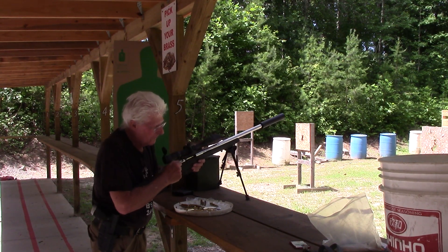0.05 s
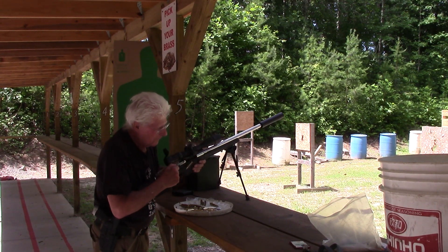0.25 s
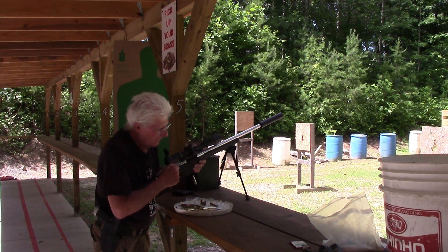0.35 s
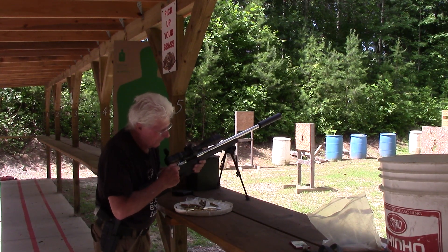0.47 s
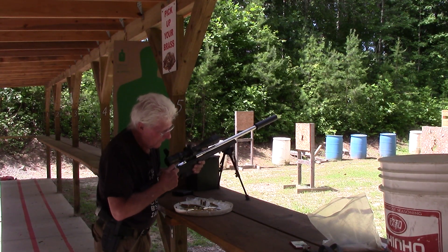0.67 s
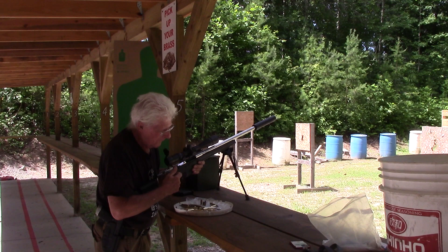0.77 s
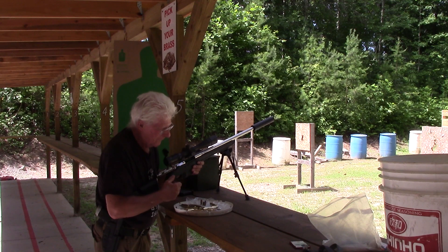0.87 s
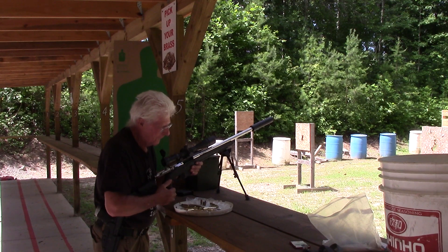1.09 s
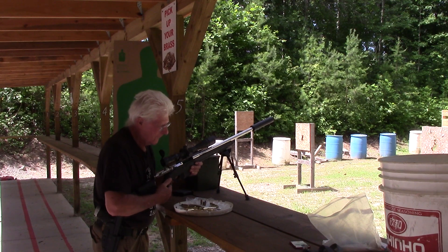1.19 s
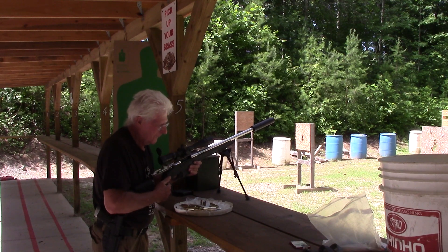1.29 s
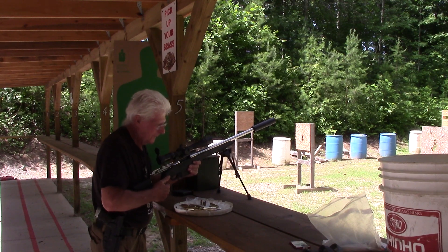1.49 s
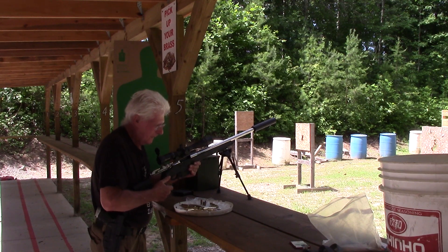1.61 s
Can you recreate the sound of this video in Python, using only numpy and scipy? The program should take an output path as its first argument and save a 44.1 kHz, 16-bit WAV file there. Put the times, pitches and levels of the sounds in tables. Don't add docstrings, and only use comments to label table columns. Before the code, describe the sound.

A rifle bolt is drawn back, hitting its stop with a bright metallic clack; the ejected brass case rings, knocks on a wooden bench, bounces and rolls, then faint handling clicks under an open shelter.

```python
import sys
import numpy as np
from scipy import signal
from scipy.fft import rfft, irfft
from scipy.io import wavfile
from scipy.ndimage import uniform_filter1d

SR = 44100
rng = np.random.default_rng(int(sys.argv[2]) if len(sys.argv) > 2 else 0)


def store_wav(level_fs):
    pcm = np.round(np.clip(np.atleast_2d(level_fs), -1, 1) * 32767)
    wavfile.write(sys.argv[1], SR, pcm.T.astype(np.int16))


def gain_from_decibels(decibels):
    exponent = np.asarray(decibels, float) / 20
    return 10 ** exponent


N = 72765

# (frequency [Hz], level [dB per Hz])
AIR = [(15, -45), (25, -24), (116, -6.5), (178, -15.5), (1170, -24.5), (1270, -22), (15500, -40)]
# (time [s], level [dB])
ENGINE_LEVEL = [(0, -43.5), (.12, -42), (.22, -44.5), (.35, -40.5), (.5, -41), (.6, -97), (.74, -81),
                (.85, -72), (1.1, -59), (1.65, -45)]
# (frequency [Hz], width [Hz], level [dB])
ENGINE_BANDS = [(77, 8.9, 8), (128, 30, 8.5), (156.6, 4.7, -5)]

# (time [s], crack [dB], receiver [dB], stock [dB], 60 dB fade [s])
BOLT_BLOWS = [
    (0.0024, -46, -48.5, -64.5, 0.11),
    (0.0548, -32, -33, -49.5, 0.16),
    (0.0835, -37, -55, -49.5, 0.064),
    (0.2143, -11.5, -38, -59, 0.051),
    (0.2574, -16.5, -38, -63, 0.1),
    (0.2768, -20.5, -22.5, -34, 0.074),
    (0.2879, -13, -51, -31, 0.024),
    (0.2945, -15, -44, -55, 0.09),
]
# (time [s], crack [dB], receiver [dB], stock [dB], 60 dB fade [s])
SLIDES = [
    (0.056, -54, -43, -64.5, 0.061),
    (0.2084, -4.5, -35.5, -54.5, 0.024),
    (0.2101, -21.5, -28.5, -37.5, 0.033),
    (0.2165, -6, -27, -62, 0.15),
    (0.2255, -11, -29.5, -66, 0.089),
    (0.309, -41.5, -26, -77, 0.041),
    (0.334, -31, -49, -63, 0.032),
]
# (frequency [Hz], level [dB])
STEEL_CRACK = [(2500, 3), (5000, 8.5), (9000, 6), (12500, 0.5), (15500, -17)]
# (frequency [Hz], width [Hz], level [dB])
RECEIVER = [(1398, 47, -0.5), (1686, 250, 1), (2020, 420, 7.5), (2246, 140, -9), (2790, 330, -2.5)]
# (frequency [Hz], width [Hz], level [dB])
STOCK = [(272, 54, 5), (533.6, 30, 18.5), (745, 39, -24.5)]
TICK_DBS = (16, 17.5, 22)
FADE_FACTORS = (0.65, 0.97, 1.16)

# (frequency [Hz], 60 dB fade [s])
SHELTER_FADE = [(300, 0.21), (1000, 0.26), (3000, 0.35), (8000, 0.24), (15000, 0.12)]
# (time [s], frequency [Hz], level [dB], 60 dB fade [s])
STRUCK_TONES = [(.0548, 4950, -44, .035), (.0548, 1500, -38, .05), (.2143, 13480, -14, .018),
                (.2143, 13720, -18, .02), (.2143, 6300, -15, .014), (.2143, 9000, -15, .01),
                (.2143, 2150, -27, .07), (.2768, 540, -32, .05), (.2879, 540, -34, .06),
                (.5234, 112, -27, .085), (.5234, 468, -15, .1), (.5234, 515, -17, .1),
                (.5234, 592, -11, .12), (.5262, 870, -18, .07), (.5262, 912, -18, .09),
                (.5234, 316, -22, .08), (.5687, 1625, -25, .06), (.6085, 885, -23, .05),
                (.6085, 965, -22, .05), (.984, 6600, -54, .04), (.996, 4700, -58, .09),
                (1.2739, 1350, -43, .03), (1.2739, 4150, -49, .022), (1.3491, 1000, -37, .045),
                (1.3491, 1320, -37, .04), (1.3981, 970, -42, .035), (1.3981, 1330, -41, .035),
                (1.537, 1900, -55, .08), (1.567, 430, -50, .05)]
# (time [s], level [dB])
RUSTLE = [(.14, -69.5), (.2, -58), (.21, -70.5), (.4, -76), (.51, -58.5), (.53, -82), (1.04, -69),
          (1.055, -53.5), (1.1, -60.5), (1.14, -77.5), (1.3, -80), (1.32, -49.5), (1.38, -68), (1.42, -59),
          (1.47, -65), (1.57, -67.5), (1.65, -69)]
# (frequency [Hz], level [dB])
FINE_CRACK = [(2500, -11), (5000, -6.5), (8500, -2), (15500, -14.5)]

# (time [s], four tone levels [dB, dB, dB, dB])
RINGS = [(.2143, -42, -40, -60, -36), (.2302, -44, -40, -22, -34), (.245, -42, -43, -26, -36),
         (.2574, -41, -40, -30, -33), (.272, -46, -43, -26, -33), (.306, -38, -38, -40, -38),
         (.352, -56, -58, -42, -54), (.395, -64, -57, -56, -56), (.5229, -85, -75, -70, -75),
         (.5686, -75, -52, -42, -40), (.6085, -75, -52, -44, -52), (.64, -80, -70, -66, -68),
         (.7168, -80, -62, -53, -74), (.748, -80, -57, -56, -74), (.805, -80, -59, -60, -86),
         (.86, -82, -64, -63, -65), (.94, -85, -84, -80, -73), (.985, -51, -74, -72, -77),
         (1.0, -55, -58, -66, -75), (1.0525, -95, -95, -95, -95)]
CASE_HZ = (6471, 9436, 13104, 14525)
# (60 dB fade [s], tumble rate [Hz], tumble depth [0-1])
CASE_SWING = [(.2, 13, .4), (.33, 19, .55), (.2, 27, .5), (.22, 31, .6)]
CASE_GAIN_DBS = (2, 4, 3, 4.5)
# (frequency [Hz], RINGS column followed [-], level [dB], 60 dB fade [s])
SIDE_TONES = [(10950, 3, -2, .07), (4680, 2, 0, .2)]
# (time [s], left level [dB], right level [dB])
RIM = [
    (.2141, -40, -40),
    (.2145, -5, -10),
    (.218, -3, -6),
    (.2245, -4, -9),
    (.2265, -13, -10),
    (.228, -34, -14),
    (.232, -60, -40),
]

# (time [s], crack [dB], knock [dB], plank [dB], 60 dB fade [s])
BOUNCES = [(0.5234, 0, -4, -14, 0.063), (0.5262, -47, -15, -21, 0.073), (0.5333, -7.5, -16, -6, 0.05),
           (0.55, -14.5, -27.5, -19.5, 0.2), (0.5687, -14.5, -18, -16.5, 0.13),
           (0.6085, -16, -22, -21, 0.15), (0.614, -33, -40, -15, 0.05), (0.6785, -36, -46, -25, 0.06),
           (0.7169, -17.5, -23, -20.5, 0.085), (0.805, -44, -53, -52, 0.057), (0.86, -62, -56, -54, 0.082),
           (0.9824, -44.5, -49, -42.5, 0.22), (1.0511, -42.5, -59, -60, 0.1), (1.079, -47, -59, -44, 0.077),
           (1.1194, -40, -50, -78, 0.03)]
# (frequency [Hz], level [dB])
WOOD_CRACK = [(1470, -21), (2500, -2), (4470, -7.5), (4860, -4.5), (11000, -18), (15500, -30)]
# (frequency [Hz], width [Hz], level [dB])
KNOCK = [(1332, 150, 6), (1442, 150, -2), (1600, 210, 8), (1880, 41, -0.5), (2043, 20, -15), (2230, 25, -7),
         (2400, 70, -4.5), (2800, 61, -23)]
# (frequency [Hz], width [Hz], level [dB])
PLANK = [(316, 40, -8), (468, 34, 0), (515, 37, -2), (592, 30, 4), (745, 40, -9), (868, 45, -3),
         (912, 40, -2), (985, 80, -3), (1080, 60, -9)]
WOOD_TICK_DBS = (14, 18, 20)
# (time [s], level [dB])
ROLL = [
    (.73, -44),
    (.8, -49),
    (.86, -48),
    (.91, -51),
    (.96, -50.5),
    (1.02, -49),
    (1.07, -55.5),
    (1.15, -79),
]

# (time [s], crack [dB], held bolt [dB], plank [dB], 60 dB fade [s])
HANDLING = [
    (1.2739, -63.5, -41, -82, 0.031),
    (1.317, -41, -51, -63, 0.25),
    (1.3491, -57, -35, -51, 0.095),
    (1.3981, -51, -37, -76, 0.054),
    (1.4107, -37.5, -60, -49, 0.11),
    (1.536, -47, -57, -55, 0.1),
    (1.5693, -39, -63.5, -51, 0.054),
    (1.6, -83.5, -80, -51, 0.041),
]
# (frequency [Hz], width [Hz], level [dB])
HELD_BOLT = [(1000, 220, 2), (1360, 260, 5), (1980, 300, -12), (2850, 500, -5), (4150, 500, 0)]
# (frequency [Hz], likeness [0-1])
LIKENESS = [(60, 0.8), (500, 1), (2000, 1), (5000, 0.49), (15000, 0.45)]


def evened(x):
    return x / np.sqrt(np.mean(x ** 2) + 1e-20)


def read(points, hz):
    f, value = np.transpose(points)
    return np.interp(np.log(hz + 1), np.log(f + 1), value)


def level(points):
    s, db = np.transpose(points)
    return gain_from_decibels(np.interp(np.arange(N) / SR, s, db, left=-140, right=-140))


def highpass(x, order, hz):
    return signal.sosfilt(signal.butter(order, hz, 'high', fs=SR, output='sos'), x)


def colour(x, points):
    return irfft(rfft(x) * gain_from_decibels(read(points, np.fft.rfftfreq(N, 1 / SR))), N)


def body(x, peaks):
    t = np.arange(4096) / SR
    ring = np.zeros(4096)
    for hz, width, db in peaks:
        fade = np.exp(-np.pi * width * t)
        ring += gain_from_decibels(db) * np.sqrt(width) * fade * np.sin(2 * np.pi * hz * t)
    return signal.oaconvolve(x, ring[None] / np.linalg.norm(ring), axes=1)[:, :N]


def crack(x, points):
    hz = np.linspace(0, SR / 2, 257)
    gain = gain_from_decibels(2 * read([(900, -21.0)] + list(points), hz)) * (hz < SR / 2)
    taps = signal.minimum_phase(signal.firwin2(255, hz, gain, fs=SR))
    return signal.oaconvolve(x, taps[None] / np.linalg.norm(taps), axes=1)[:, :N]


def hits(rows, top, middle, low, tick_dbs=TICK_DBS):
    rise_s = 0.00043
    t = np.arange(N) / SR
    noise = rng.standard_normal((3, 2, N))
    power, ticks = np.zeros((3, 1, N)), np.zeros((3, 1, N))
    for s, *dbs, t60 in rows:
        u = np.maximum(t - s, 0)
        gains = gain_from_decibels(np.array(dbs) + [-6, 1.5, 1.5])
        fade = np.array([gain_from_decibels(-60 * u / (t60 * k)) for k in FADE_FACTORS])
        shape = fade * (1 - np.exp(-u / rise_s))
        power += ((shape * gains[:, None]) ** 2)[:, None]
        ticks[:, 0, round(s * SR)] -= gains * gain_from_decibels(np.array(tick_dbs))
    drive = np.sqrt(power) * noise + ticks
    return crack(drive[0], top) + body(drive[1], middle) + body(drive[2], low)


def woods():
    air = gain_from_decibels(-52.5) * evened(colour(rng.standard_normal((2, N)), AIR))
    engine = body(rng.standard_normal((2, N)), ENGINE_BANDS)
    return air + 0.64 * level(ENGINE_LEVEL) * highpass(engine, 3, 58)


def bolt():
    blows = hits(BOLT_BLOWS, STEEL_CRACK, RECEIVER, STOCK)
    scrapes = hits(SLIDES, STEEL_CRACK, RECEIVER, STOCK, (-60, -60, -60))
    return blows + scrapes


def shelter(x):
    taps = np.zeros((2, SR // 2))
    at = np.arange(200, SR // 2 - 20, 20)
    at = at + rng.integers(0, 20, (2, len(at)))
    np.put_along_axis(taps, at, rng.choice([-1., 1.], at.shape), 1)
    hz, t, z = signal.stft(taps, SR, nperseg=256)
    fade = gain_from_decibels(-60 * t / read(SHELTER_FADE, hz)[:, None])
    tail = signal.istft(z * fade, SR, nperseg=256)[1]
    return signal.fftconvolve(x, tail / np.linalg.norm(tail[0]), axes=1)[:, :N]


def struck():
    out = np.zeros(N)
    for s, hz, db, t60 in STRUCK_TONES:
        u = np.maximum(np.arange(N) / SR - s, 0)
        rise = 1 - np.exp(-2 * hz * u)
        out += rise * gain_from_decibels(db - 60 * u / t60) * np.sin(2 * np.pi * hz * u)
    return out


def rustle():
    swell = evened(uniform_filter1d(rng.standard_normal(N), size=90))
    grains = rng.standard_normal((2, N)) * gain_from_decibels(3.6 * swell)
    return 2 * crack(evened(grains) * level(RUSTLE), FINE_CRACK)


def case():
    flutter_db, flutter_s = 3, 0.008
    rim_hz, rim_db = 13155, 1
    t, rows = np.arange(N) / SR, np.array(RINGS)
    k = np.maximum(np.searchsorted(rows[:, 0], t) - 1, 0)
    u = t - rows[k, 0]
    out = np.zeros((2, N))
    for m, (hz, (t60, tumble_hz, depth)) in enumerate(zip(CASE_HZ, CASE_SWING)):
        fade = (u >= 0) * gain_from_decibels(rows[k, 1 + m] + CASE_GAIN_DBS[m] - 60 * abs(u) / t60)
        fade = uniform_filter1d(fade, size=40)
        for ch, lag in enumerate((.02, .3)):
            swing = 1 + depth * np.cos(2 * np.pi * (tumble_hz * u + lag * m))
            flutter = rng.standard_normal(N)
            for _ in range(2):
                flutter = uniform_filter1d(flutter, round(flutter_s * SR))
            flutter = evened(flutter)
            tone = np.sin(2 * np.pi * hz * t + 1.2 * ch * flutter)
            out[ch] += fade * swing * gain_from_decibels(flutter_db * flutter) * tone
    for hz, follows, db, t60 in SIDE_TONES:
        fade = gain_from_decibels(rows[k, follows] + db - 60 * abs(u) / t60)
        out += fade * (t > BOUNCES[8][0]) * np.sin(2 * np.pi * hz * t)
    s, *sides = np.transpose(RIM)
    facing = np.array([level(np.transpose([s, db + rim_db])) for db in sides])
    return 2 * out + facing * np.sin(2 * np.pi * rim_hz * t)


def bounces():
    return hits(BOUNCES, WOOD_CRACK, KNOCK, PLANK, WOOD_TICK_DBS)


def roll():
    taps_per_s, spread_db, knock_db, crack_db = 320, 6, -10, -43
    chosen = rng.random(N) < taps_per_s / SR
    strength = gain_from_decibels(spread_db * np.minimum(rng.exponential(1, N), 2.5))
    taps = rng.standard_normal((2, N)) * (0.33 + chosen * strength)
    taps = 2 * evened(taps) * level(ROLL)
    knock = gain_from_decibels(knock_db) * body(taps, KNOCK)
    return body(taps, PLANK) + knock + gain_from_decibels(crack_db) * crack(taps, WOOD_CRACK)


def handling():
    return hits(HANDLING, FINE_CRACK, HELD_BOLT, PLANK)


def scene():
    shelter_db, right_db = -10.5, -20.5
    near = bolt() + rustle() + bounces() + roll() + handling()
    near = highpass(near, 2, 260)
    near = near + struck()
    brass = case()
    left, other = near + gain_from_decibels(shelter_db) * shelter(near + brass) + woods()
    same = read(LIKENESS, np.fft.rfftfreq(N, 1 / SR))
    right = irfft(same * rfft(left) + np.sqrt(1 - same ** 2) * rfft(other), N)
    return (np.array([left, right]) + brass) * gain_from_decibels(np.array([[0], [right_db]]))


def low_pass(x):
    return signal.sosfilt(signal.butter(12, 16410, fs=SR, output="sos"), x)


def record(dry):
    duck_from_db, duck_share, recover_db_per_s = -40, 0.14, 15
    power_db = 10 * np.log10(abs(uniform_filter1d(dry[0] ** 2, size=400)) + 1e-12)
    fall = np.arange(N) * recover_db_per_s / SR
    held_db = np.maximum.accumulate(power_db + fall) - fall
    over_db = np.maximum(held_db - duck_from_db, 0)
    late_db = signal.lfilter([.002], [1, -.998], over_db)
    x = np.clip(dry / gain_from_decibels(duck_share * late_db), -1, 1)
    band_limit = signal.firwin(191, 15850, window=("kaiser", 9), fs=SR)
    x = signal.oaconvolve(x, band_limit[None], "same")
    finished_mix = np.clip(highpass(x, 2, 40), -1, 1)
    return low_pass(finished_mix)


dry = scene()
out = record(dry)
store_wav(out)
```